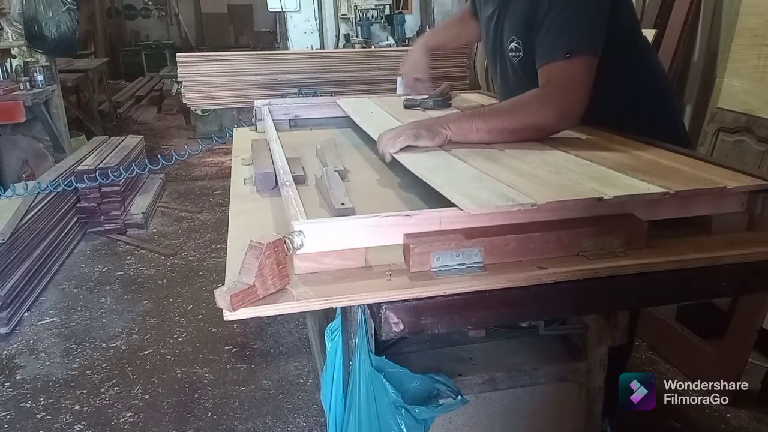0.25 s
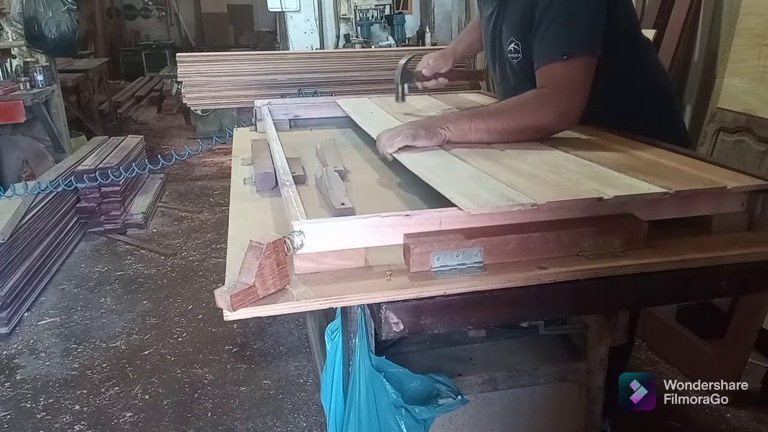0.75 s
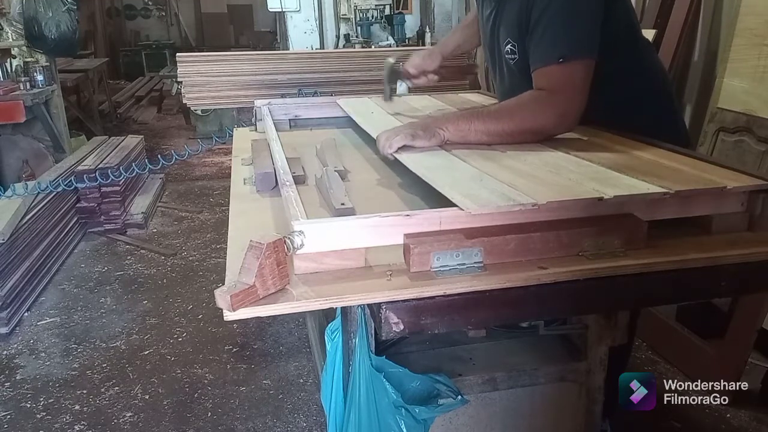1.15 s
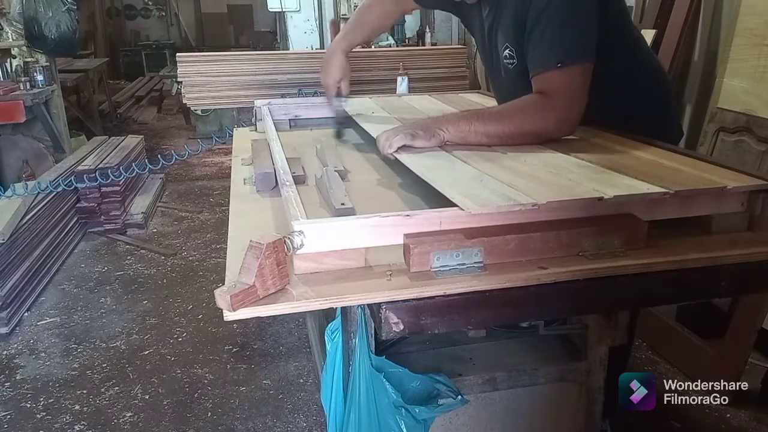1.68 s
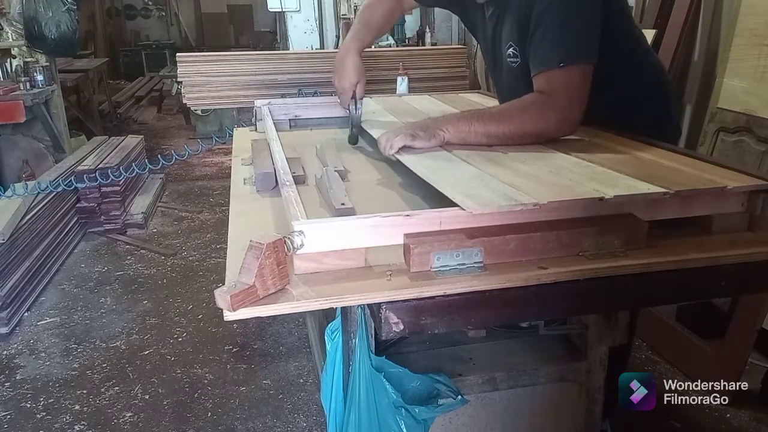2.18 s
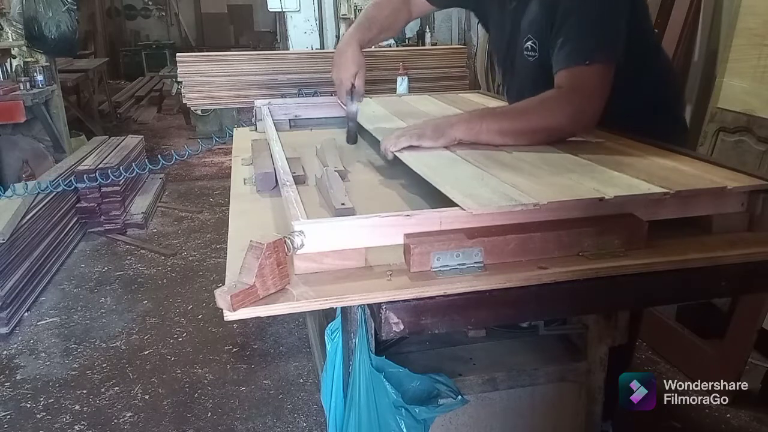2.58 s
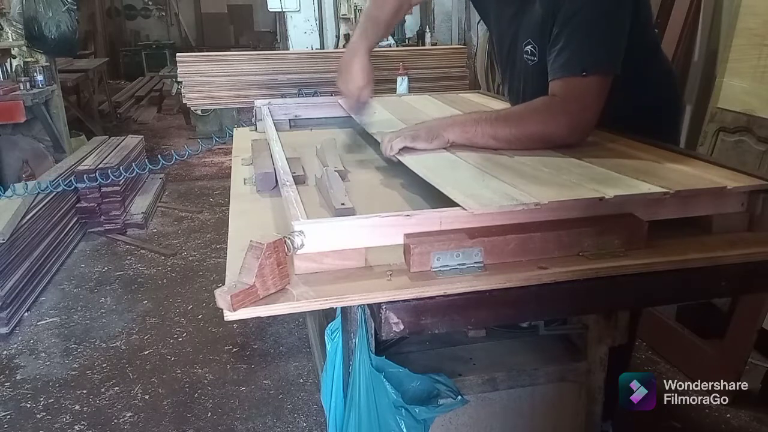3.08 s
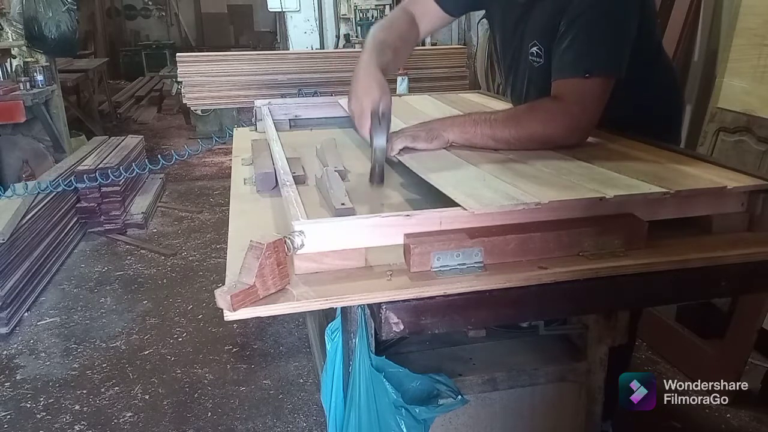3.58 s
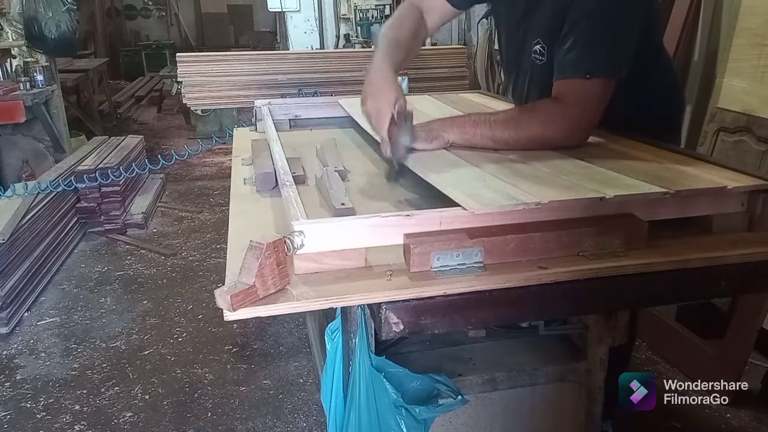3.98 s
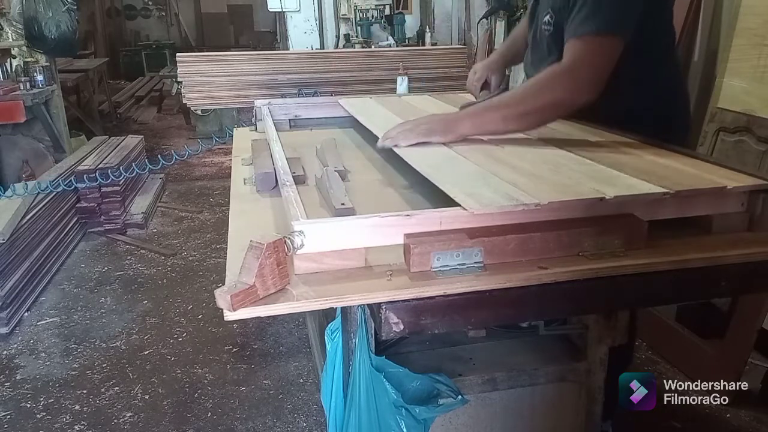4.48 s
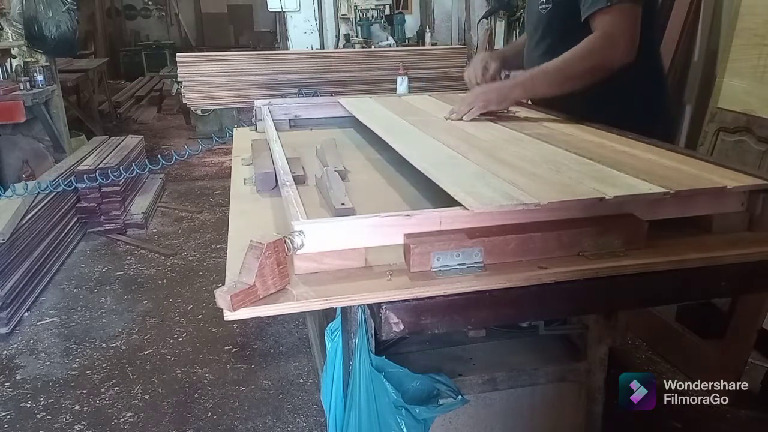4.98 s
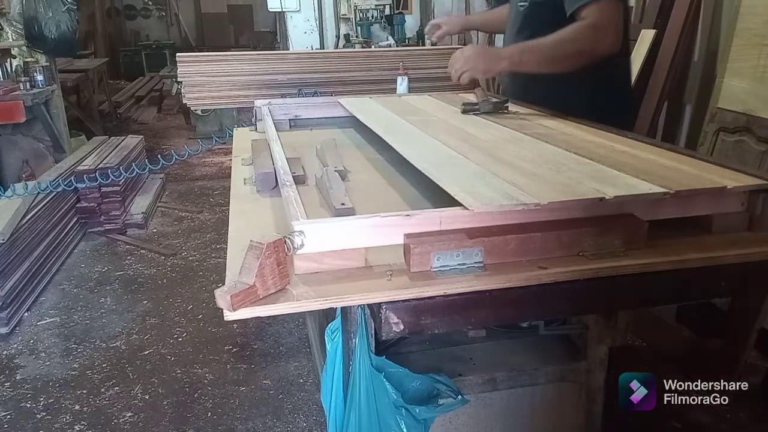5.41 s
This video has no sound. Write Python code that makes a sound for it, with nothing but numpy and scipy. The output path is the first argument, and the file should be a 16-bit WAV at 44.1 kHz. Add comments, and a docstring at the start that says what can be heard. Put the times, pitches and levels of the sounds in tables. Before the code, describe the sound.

A hammer knocks wooden boards into place in uneven bursts, with wood sliding on wood in a quiet workshop.

```python
"""A workshop, with a phone microphone close to a wooden jig; ceiling boards are being hammered into it.
The blows come in twos and threes: each cracks, rattles the board in its groove and rings frame and bench,
and the room answers. Between blows wood slides on wood, over quiet air and one faint, thin whistle.
The phone ducks the hardest blows, suppresses the faint tails and passes little above 8 kHz."""
import sys
import numpy as np
from scipy import signal
from scipy.fft import rfft, irfft
from scipy.io import wavfile
from scipy.ndimage import uniform_filter1d, minimum_filter1d

SR = 44100
rng = np.random.default_rng(int(sys.argv[2]) if len(sys.argv) > 2 else 0)


def log_audio(samples):
    """Write samples as a 16-bit WAV file to the path given in sys.argv[1]."""
    # one column per channel
    frames = np.atleast_2d(samples).T
    # limit to full scale, then quantise
    limited = np.clip(frames, -1, 1)
    pcm = np.round(limited * 32767).astype(np.int16)
    wavfile.write(sys.argv[1], SR, pcm)


N = 249165

# room tone of the workshop: f/Hz, octave-band level/dB
AIR_SPECTRUM = [(25, -24), (80, -9), (250, -3), (600, 1.5), (1500, -4), (3200, -2.5), (6000, -4.5),
                (12000, -3.5)]
# a faint whistle in the pause after the last blow: t/s, level/dB
WHISTLE_LEVELS = [(4.6, -83), (4.909, -84), (4.97, -68.5), (5.05, -82.5), (5.131, -80.5), (5.248, -75.5),
                  (5.35, -100)]
# reverberation of the workshop: f/Hz, t60/s
ROOM_DECAY = [(80, 1), (200, 0.66), (500, 0.57), (1200, 0.48), (2600, 0.42), (5000, 0.35), (8000, 0.32)]
# board, hand and hammer sliding over wood: t/s, length/s, rasp level/dB, hiss level/dB
SLIDE_STROKES = [ (-0.03, 0.075, -56, -63), (0.106, 0.085, -62, -70.5), (1.885, 0.12, -52, -55),
                 (2.107, 0.054, -60.5, -66), (2.215, 0.048, -63, -69), (3.858, 0.64, -49.5, -55),
                 (5.206, 0.096, -80.5, -56.5), (5.271, 0.14, -59.5, -57), (5.401, 0.2, -61, -67),
                 (5.588, 0.074, -62.5, -57)]
# low rasp of sliding wood: f/Hz, octave-band level/dB
RASP_SPECTRUM = [(30, -51.5), (100, -16), (300, -5.5), (600, -2.5), (1100, 1), (1800, 6), (2800, 6),
                 (4200, -1.5), (8000, -25)]
# fine hiss of sliding wood: f/Hz, octave-band level/dB
HISS_SPECTRUM = [(1000, -32.5), (2500, -11), (4000, 0), (6500, -1.5), (8000, -6.5)]
# what the struck wood radiates: f/Hz, octave-band level/dB
WOOD_SPECTRUM = [(25, -55.5), (50, -37.5), (75, -22), (110, -13), (170, -3), (280, 0.5), (430, -4.5),
                 (700, -2.5), (1100, -5), (2600, -0.5), (4200, -2.5), (5200, -3.5), (7000, -6.5)]
# dense short resonances of the struck board: f/Hz, width/Hz, level/dB
BOARD_RESONANCES = [(1250, 55, 3.5), (1420, 600, 0.5), (2040, 99, 0.5), (2500, 240, 0.5), (3330, 200, -0.5),
                    (6300, 1800, 4)]
# modes of boards, frame and bench, then faint steel rings: f/Hz, level/dB, t60/s
FRAME_MODES = [(94.86, -14, .42), (113.5, -23, 0.85), (155, -9.5, 0.1), (202.4, -7, .42),
               (275.9, -3.5, 0.28), (305, -5, 0.26), (353.8, -6, 0.22), (407.2, -7, 0.43),
               (520.4, -8, 0.39), (570, -15.5, 0.24), (643, -17, 0.57), (811, -16, 0.4), (941, -14.5, 0.51),
               (1020, -11, 0.37), (1250, -17.5, 0.17), (1440, -4, 0.23), (1757, -17.5, 0.34),
               (1900, -6.5, 0.19), (2180, -11.5, 0.12), (2380, -14, 0.22), (2590, -16, 0.26),
               (2830, -16, 0.41), (4030, -26, 0.56), (4660, -19.5, 0.15), (5470, -22, .4),
               (6000, -20, 0.31)]
# direct path from the struck spot to the microphone: f/Hz, level/dB
DIRECT_PATH = [(60, -22.5), (130, -7.5), (280, -3), (800, 1), (1400, 6), (2500, 3.5), (3800, -1),
               (7000, -2.5)]
# blows and small knocks: t/s, level/dB, brightness/(dB/octave), roundness/(dB/octave^2), rattle/ms,
# resonance favoured by the striking place f/Hz, its lift/dB
HAMMER_BLOWS = [ (0.004, -60, -4, -0.3, 6.1, 295, 7), (0.076, -56, -2, -0.35, 2.9, 2410, 5),
                (0.111, -51.5, -6, 0.46, 3.3, 348, 11), (0.4478, -15, 0, 1.6, 1.0, 557, 2.5),
                (0.591, -14, 0.5, 1.4, 0.17, 2570, 5), (1.2036, -26, -2.5, -0.1, 6.1, 524, 5),
                (1.437, -21.5, -2, 0.94, 4.5, 590, 3), (1.6647, -17.5, 0.45, 0.16, 2.3, 570, 5),
                (2.3217, -27.5, -4.5, 0.1, 6, 181, 3.5), (2.4928, -24.5, -3.5, -0.1, 5.6, 297, 5.5),
                (2.6944, -19.5, -2.5, 0.37, 5.7, 2240, 2.5), (3.2785, -33.5, -6.5, 0, 2.8, 333.4, 15.5),
                (3.3092, -31, -4.5, -.6, 2.5, 276, 9.5), (3.4679, -27, -4.4, -0.15, 3.2, 190, 8),
                (3.750, -46.5, -5.5, 1.8, 9, 324, 8.5), (4.0257, -36, -5.5, 0.5, 3.5, 209, 7),
                (4.2195, -21, -1.85, 2, 0.7, 209, 19), (4.336, -20, -0.44, 2, 0.72, 1260, 3.5),
                (4.402, -31, -3, 1.6, 0.53, 1222, 6), (5.0, -67, -2, 0.7, 15, 341, 5),
                (5.3203, -67.5, 8, 3, 3.4, 3900, 11), (5.494, -60, 7.5, 6.5, 16, 1610, 10.5)]
# response of the phone: f/Hz, level/dB
PHONE_RESPONSE = [(6800, 0.5), (7400, -4), (7850, -14.5), (8300, -31), (9200, -34.5), (10300, -25),
                  (12000, -43.5), (14000, -44), (15500, -52)]

TAIL_S = 2 / 3  # length of one blow and of the room's answer


def undb(db):
    """Decibels to gain."""
    return np.exp(np.asarray(db) * (np.log(10) / 20))


def unit(x):
    """Scale to rms 1."""
    return x / np.sqrt(np.mean(x ** 2))


def at(points, hz):
    """Read (f/Hz, value) points on a log-frequency axis."""
    f, value = np.transpose(points)
    return np.interp(np.log(np.maximum(hz, 1)), np.log(f), value)


def hump(hz, centre, width):
    """Resonance shape, 1 at the centre."""
    return 1 / (1 + (2 * (hz - centre) / width) ** 2)


def fade(t, t60):
    """Exponential decay, 60 dB down after t60."""
    return undb(-60 * t / t60)


def colour(x, db_of_hz, size=4096):
    """Causal filter with the given dB curve, built from the cepstrum."""
    cepstrum = irfft(np.log(undb(db_of_hz(np.fft.rfftfreq(size, 1 / SR)))))
    cepstrum[1:size // 2] *= 2
    cepstrum[size // 2 + 1:] = 0
    return signal.fftconvolve(x, irfft(np.exp(rfft(cepstrum))))[:len(x)]


def pink_db(hz):
    """Gain that gives white noise of rms 1 a power of 1 in every octave."""
    return 10 * np.log10(SR / 2 / np.log(2) / np.maximum(hz, 20))


def shaped(x, points):
    """Give white noise an octave-band spectrum, at rms 1."""
    return unit(colour(x, lambda f: at(points, f) + pink_db(f)))


def drift(rate_hz):
    """Smooth random drift at rms 1."""
    hold = int(SR / rate_hz)
    steps = np.repeat(rng.standard_normal(N // hold + 1), hold)
    return unit(uniform_filter1d(steps, hold)[:N])


def workshop_air(level_db=-68.5):
    """Room tone: faint, steady air."""
    return undb(level_db) * shaped(rng.standard_normal(N), AIR_SPECTRUM)


def whistle(pitch_hz=3215, waver=0.0073, flutter_db=2):
    """A thin tone just over the room tone, wavering in pitch and level."""
    level_db = np.interp(np.arange(N) / SR, *np.transpose(WHISTLE_LEVELS), left=-np.inf)
    level_db += flutter_db * drift(35)
    hz = pitch_hz * (1 + waver * drift(180))
    return undb(level_db) * unit(np.sin(2 * np.pi * np.cumsum(hz) / SR))


def room_tail(t, build_s=0.0024):
    """Diffuse reflections build up quickly, and each band dies at its own rate."""
    noise, hz = rfft(rng.standard_normal(len(t))), np.fft.rfftfreq(len(t), 1 / SR)
    centres, t60s = np.transpose(ROOM_DECAY)
    tail = 0
    for t60, share in zip(t60s, np.eye(len(centres))):
        band = irfft(noise * at(np.c_[centres, share], hz), len(t))
        tail += band * fade(t, t60)
    return tail * (1 - np.exp(-t / build_s))


def stroke(start_s, length_s, swell_share=0.32, stop_t60_s=0.2):
    """Envelope of one slide: it gathers speed over a share of its length, holds, then dies away."""
    age = np.arange(N) / SR - start_s
    swell = np.clip(age / (swell_share * length_s), 0, 1) ** 2
    return swell * fade(np.maximum(age - length_s, 0), stop_t60_s)


def sliding_wood(grain_db=2.0, uneven_db=2.0, room_db=-3):
    """Wood fibres catch and slip in dense uneven grains: a low rasp and a fine hiss, with room behind."""
    envelopes = sum(np.outer(undb([rasp_db, hiss_db]), stroke(start_s, length_s))
                    for start_s, length_s, rasp_db, hiss_db in SLIDE_STROKES)
    direct = 0
    for envelope, spectrum in zip(envelopes, (RASP_SPECTRUM, HISS_SPECTRUM)):
        noise = rng.standard_normal(N)
        catch_db = grain_db * np.tanh(drift(900)) + uneven_db * np.tanh(drift(45))
        direct += shaped(noise * undb(catch_db), spectrum) * envelope
    tail = room_tail(np.arange(int(TAIL_S * SR)) / SR)
    return direct + undb(room_db) * signal.fftconvolve(direct, tail / np.linalg.norm(tail))[:N]


def board_db(hz):
    """Radiation of the wood with the humps of the board's resonances."""
    return at(WOOD_SPECTRUM, hz) + sum(db * hump(hz, f, width) for f, width, db in BOARD_RESONANCES)


def striking_place(spread_db=3.0, count=80):
    """Each place excites the board's many upper bending modes unevenly: points of f/Hz, level/dB."""
    hz = np.linspace(np.sqrt(400), np.sqrt(8000), count) ** 2
    scatter = rng.standard_normal(count)
    ripple_db = spread_db * (scatter - uniform_filter1d(scatter, 4))
    ripple_db[0] = 0  # flat below 400 Hz
    return np.c_[hz, ripple_db]


def blow_db(hz, level_db, brightness, roundness, favoured_hz, lift_db, mid_hz=874):
    """A blow's drive: brightness tilts it, roundness bends both ends, the place lifts one resonance."""
    octaves = np.log2(np.clip(hz, 200, 6050) / mid_hz)
    arch_db = brightness * octaves - roundness * octaves ** 2
    return level_db + arch_db + lift_db * hump(hz, favoured_hz, width=0.17 * favoured_hz)


def contact(t, rattle_s, flex_s=0.0039, flex=0.89, settle=0.79, direct_s=0.008):
    """The first strike, then micro-impacts as the board chatters in its groove and flexes."""
    chatter = rng.standard_normal(len(t)) * np.exp(-t / (settle * rattle_s + flex_s))
    chatter *= 1 - np.exp(-t / rattle_s)
    force = flex * (1 + rattle_s / flex_s) ** 2 * chatter / np.linalg.norm(chatter)
    force[0] += 1  # the strike itself
    force *= np.sqrt(direct_s * SR) / np.linalg.norm(force)
    # a narrow board radiates its slow bending poorly
    return colour(force, lambda f: at(DIRECT_PATH, f))


def disperse(x, lag_ms=0.5):
    """Bending waves carry the treble fastest; lag_ms is the travel time at 1 kHz."""
    size = 2 * len(x)
    khz = np.fft.rfftfreq(size, 1 / SR) / 1000
    lag_cycles = 2 * lag_ms * np.sqrt(khz)
    return irfft(rfft(x, size) * np.exp(-2j * np.pi * lag_cycles), size)[:len(x)]


def frame_ring(t, drive_db, scatter_db=2, detune=0.003, swell_s=0.0064):
    """The modes swell as the blow spreads through the frame; each blow weights them anew."""
    ring = np.zeros(len(t))
    draws = rng.standard_normal((len(FRAME_MODES), 3))
    for (hz, db, t60), (weight, shift, phase) in zip(FRAME_MODES, draws):
        age = t[t < t60]
        wave = np.sin(2 * np.pi * (hz * (1 + detune * shift) * age + phase))
        ring[:len(age)] += undb(db + drive_db(hz) + scatter_db * weight) * fade(age, t60) * wave
    return ring * (1 - np.exp(-t / swell_s))


def hammer(ring_db=1, room_db=-2, tight_db=6, smear_db=1.78, contact_samples=4096):
    """Blows close to the microphone: direct crack, room and ringing frame, coloured by the place struck."""
    track, t = np.zeros(N + SR), np.arange(int(TAIL_S * SR)) / SR
    fade_out = np.minimum(1, 10 * (TAIL_S - t))
    for start_s, level_db, brightness, roundness, rattle_ms, favoured_hz, lift_db in HAMMER_BLOWS:
        drive_db = lambda hz: blow_db(hz, level_db, brightness, roundness, favoured_hz, lift_db)
        place = striking_place()
        strike = disperse(contact(t[:contact_samples], rattle_ms / 1000))
        burst = undb(room_db) * room_tail(t)
        # a tight blow cracks, a rattling one smears: each doubling of the rattle costs smear_db
        burst[:contact_samples] += undb(tight_db - smear_db * np.log2(rattle_ms)) * strike
        crack = colour(burst, lambda f: board_db(f) + at(place, f) + drive_db(f) + pink_db(f))
        ring = undb(ring_db) * frame_ring(t, drive_db)
        start = int(start_s * SR)
        track[start:start + len(t)] += fade_out * (crack + ring)
    return track[:N]


def scene():
    """One microphone close to the jig: blows and sliding in front, the quiet workshop behind."""
    return (hammer() + sliding_wood() + whistle() + workshop_air())[None]


def suppressor(x, threshold_db=-83, slope_db=-3.5, depth_db=-10, size=768):
    """The phone sinks faint bands, so tails end early; its threshold tilts by slope_db an octave."""
    frames = dict(fs=SR, nperseg=size, noverlap=size - size // 4)
    hz, _, spectrum = signal.stft(x, **frames)
    power = uniform_filter1d(uniform_filter1d(abs(spectrum) ** 2, size=3, axis=0), size=3, axis=1)
    octaves = np.log2(np.maximum(hz, 200) / 1000)
    threshold = undb(threshold_db + slope_db * octaves)[:, None] ** 2
    gain = np.maximum(power / (power + threshold), undb(depth_db))
    return signal.istft(spectrum * gain, **frames)[1][:N]


def limiter(x, ceiling_db=-14, sense_s=0.0098, ahead_s=0.008, release_s=0.033, ramp_s=0.0023):
    """The phone turns down just before a loud blow and recovers while the room still rings."""
    power = uniform_filter1d(x ** 2, int(sense_s * SR))
    over_db = np.maximum(10 * np.log10(np.maximum(power, 1e-12)) - ceiling_db, 1e-6)
    ahead = int(ahead_s * SR)
    coming_db = -minimum_filter1d(-over_db, ahead, origin=-(ahead // 2))
    # the cut jumps to each new peak and relaxes exponentially
    relax = np.arange(N) / SR / release_s
    cut_db = np.exp(np.maximum.accumulate(np.log(coming_db) + relax) - relax)
    return x * undb(-uniform_filter1d(cut_db, int(ramp_s * SR)))


def record(dry, headroom=4.7, top_hz=15700):
    """The phone suppresses faint noise, limits the blows, rounds the peaks and cuts the treble."""
    limited = limiter(suppressor(dry[0]))
    rounded = headroom * np.tanh(limited / headroom)
    dulled = colour(rounded, lambda f: at(PHONE_RESPONSE, f))
    lowpass = signal.ellip(8, 0.2, 70, top_hz, fs=SR, output="sos")
    return signal.sosfilt(lowpass, dulled)[None]


dry = scene()
out = record(dry)
log_audio(out)
```